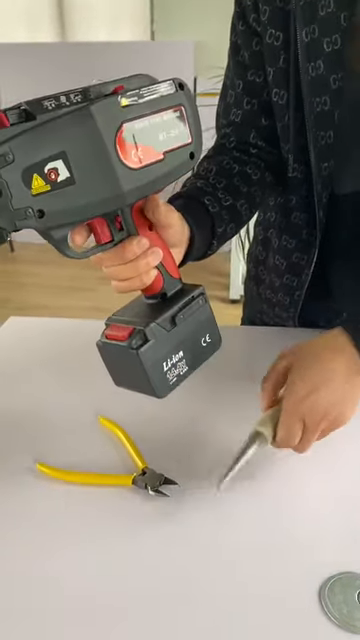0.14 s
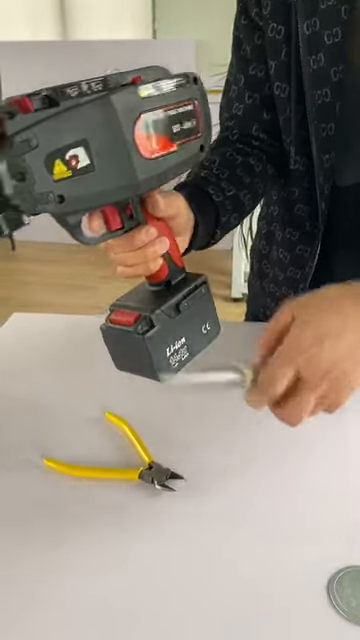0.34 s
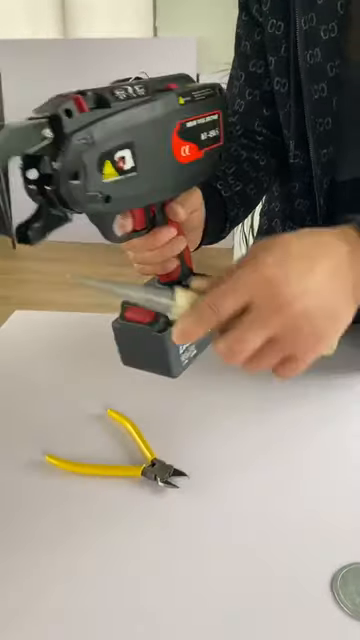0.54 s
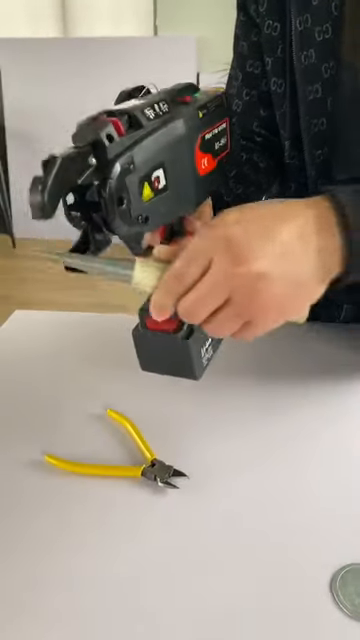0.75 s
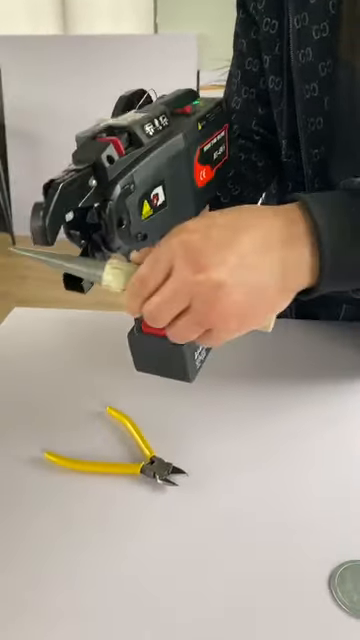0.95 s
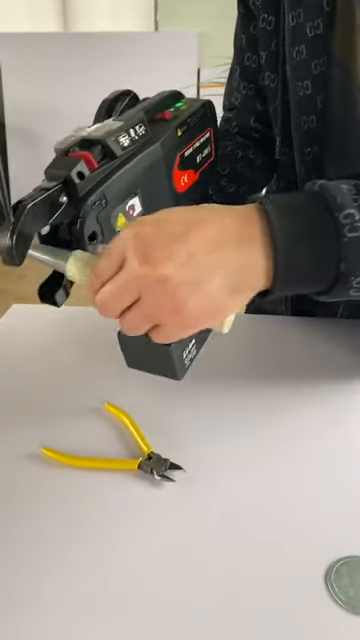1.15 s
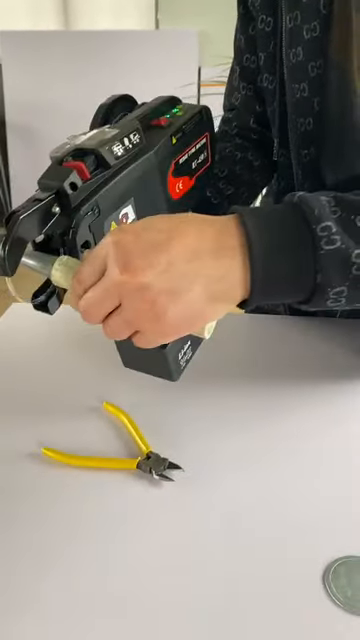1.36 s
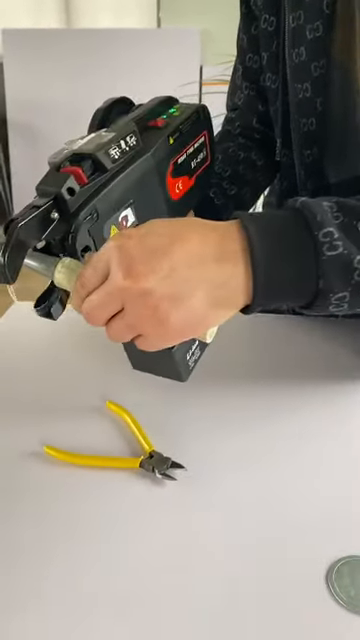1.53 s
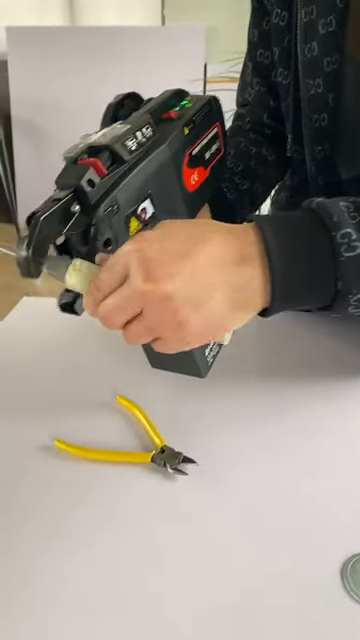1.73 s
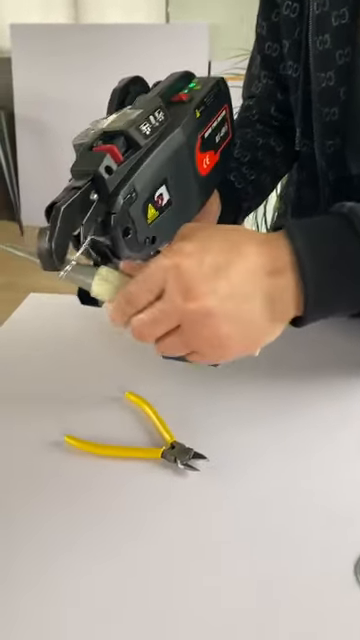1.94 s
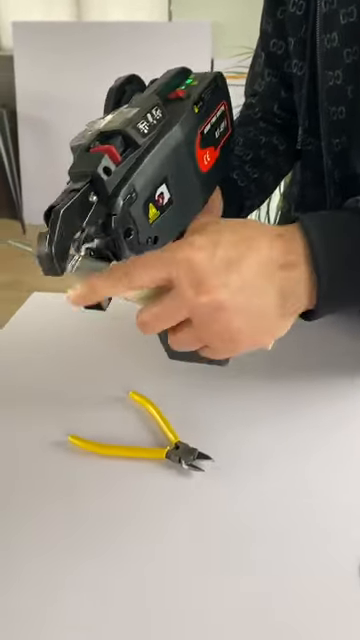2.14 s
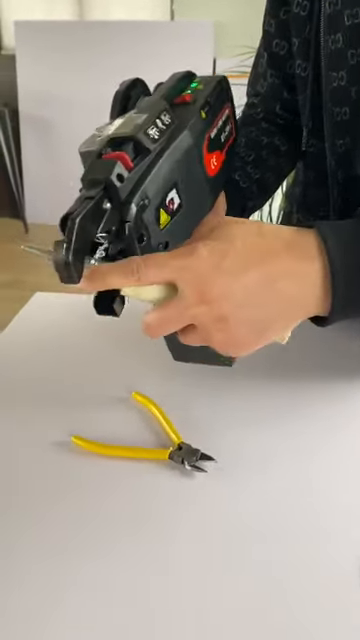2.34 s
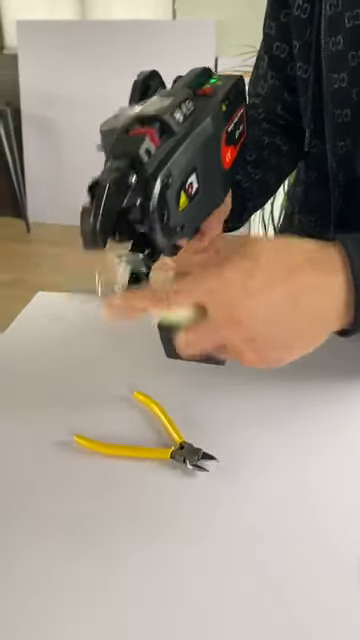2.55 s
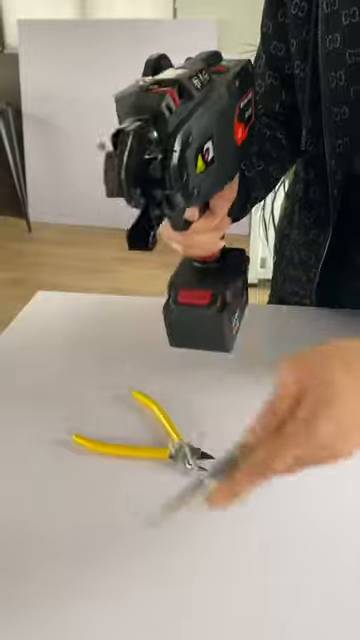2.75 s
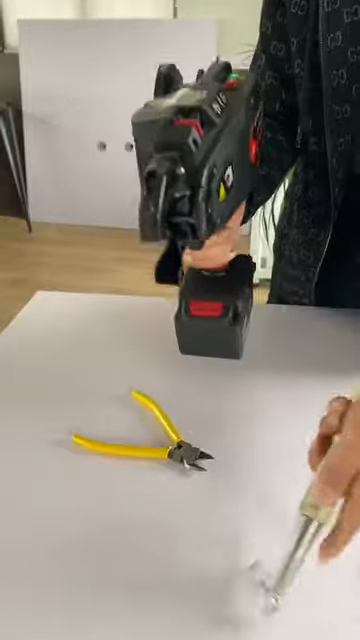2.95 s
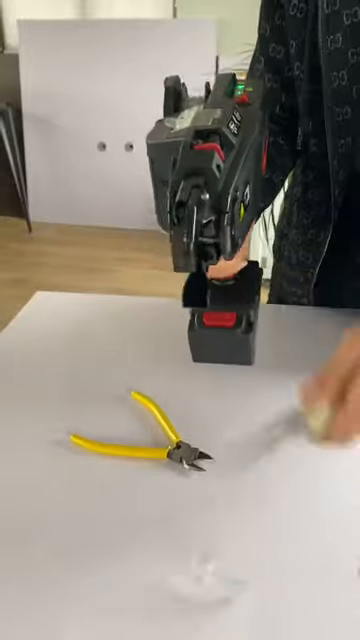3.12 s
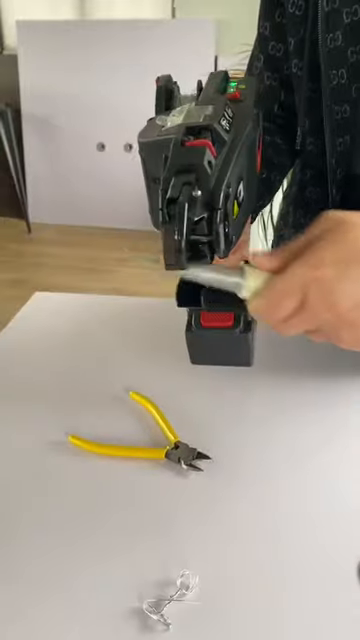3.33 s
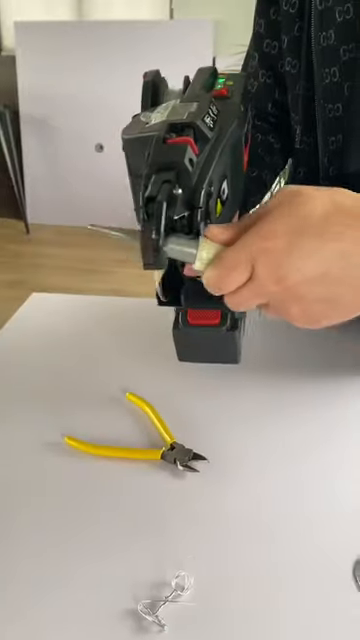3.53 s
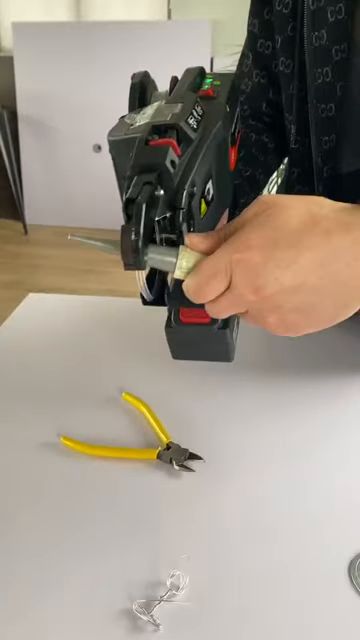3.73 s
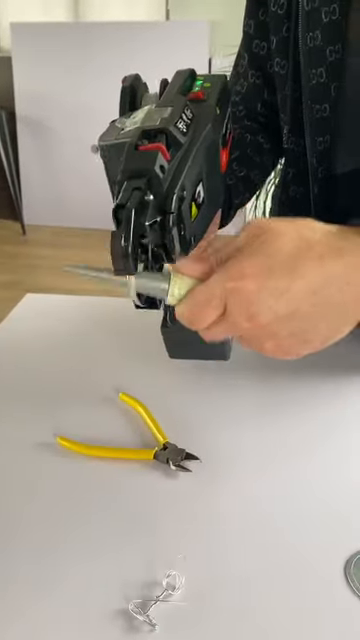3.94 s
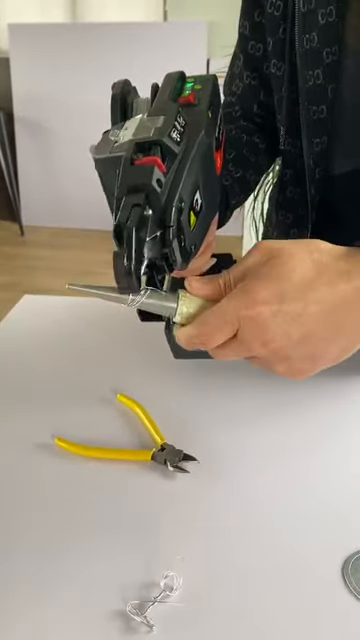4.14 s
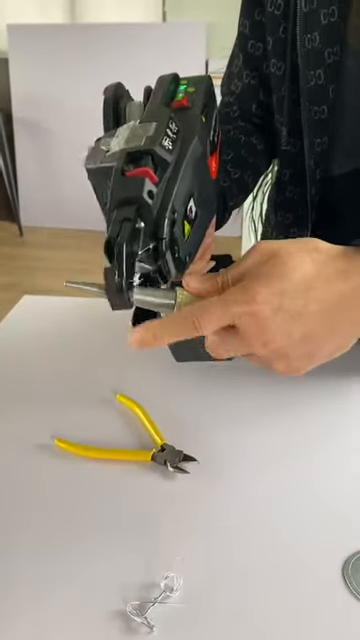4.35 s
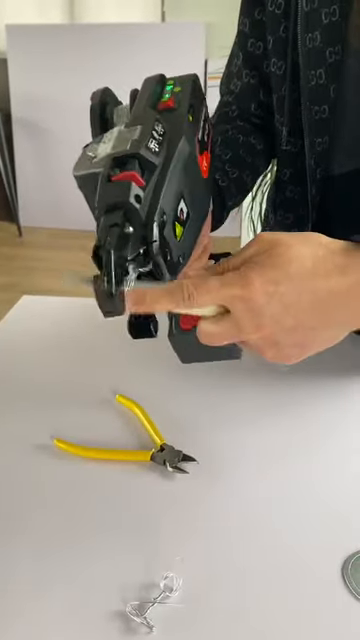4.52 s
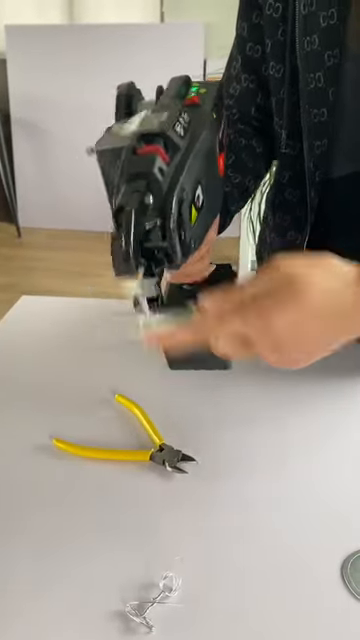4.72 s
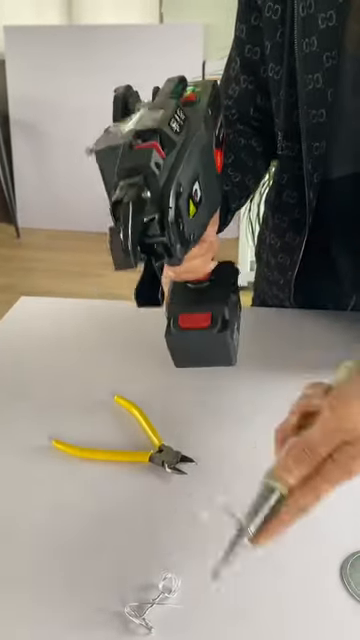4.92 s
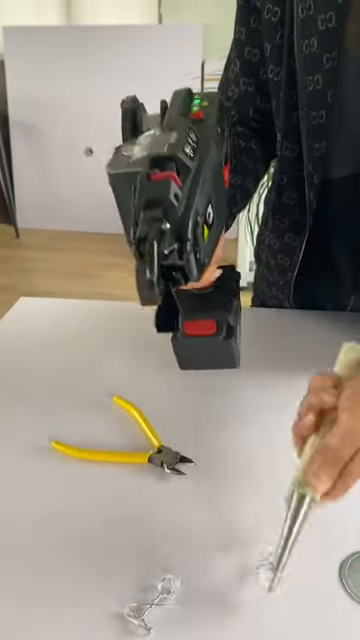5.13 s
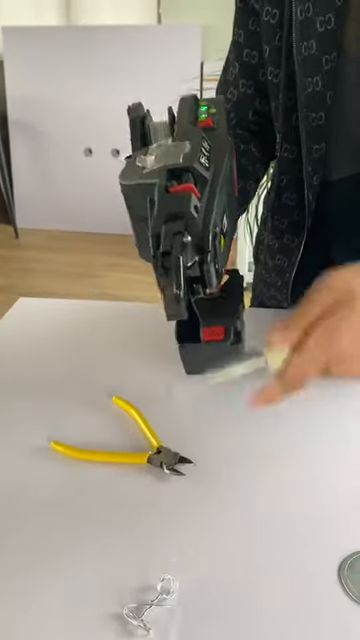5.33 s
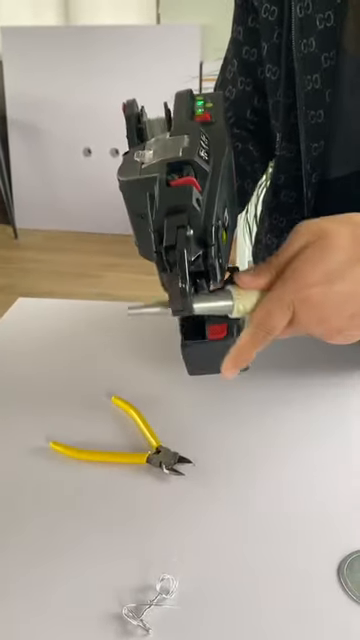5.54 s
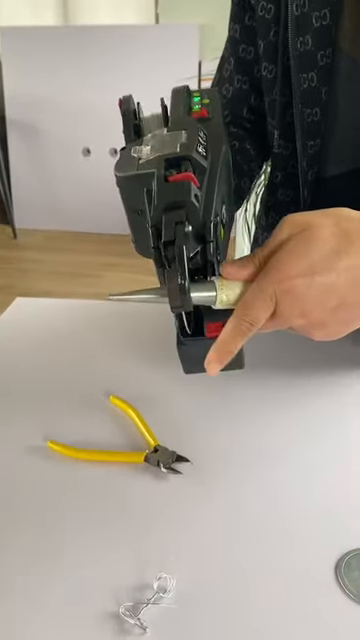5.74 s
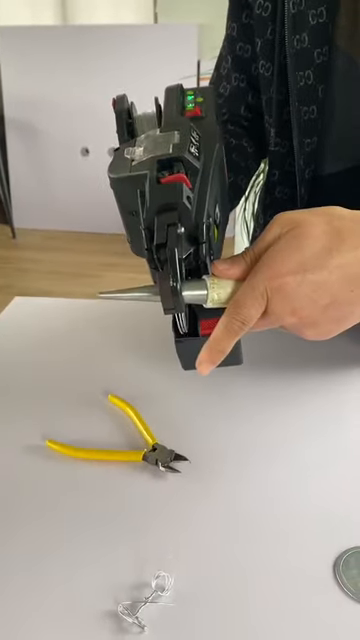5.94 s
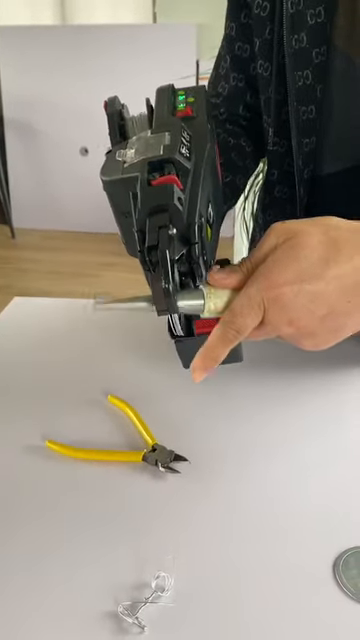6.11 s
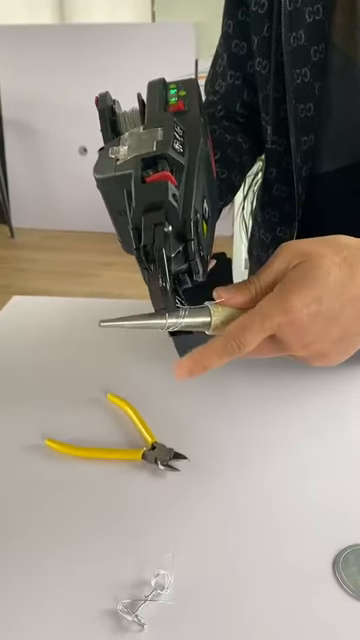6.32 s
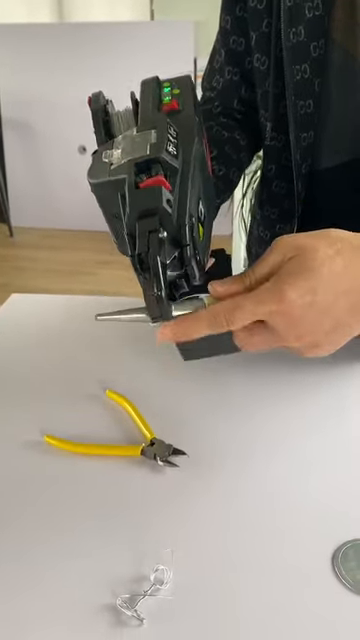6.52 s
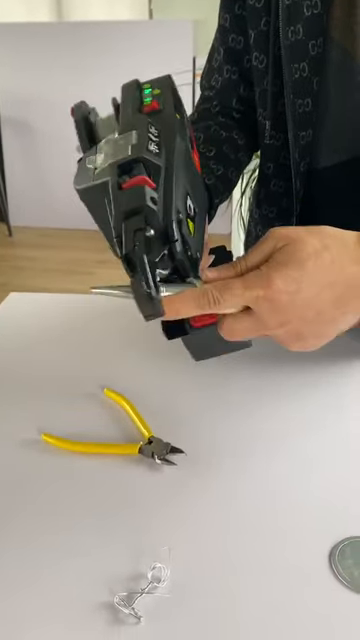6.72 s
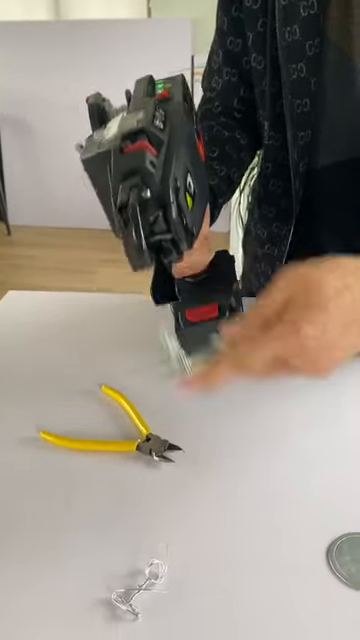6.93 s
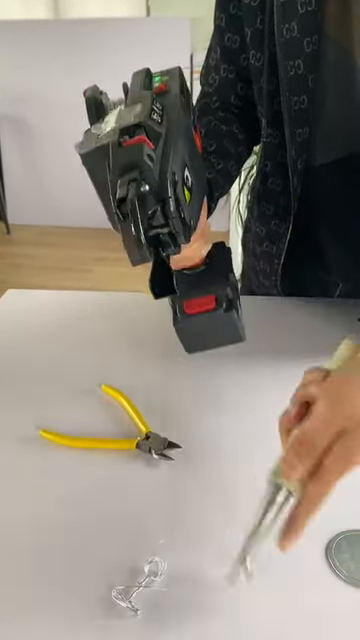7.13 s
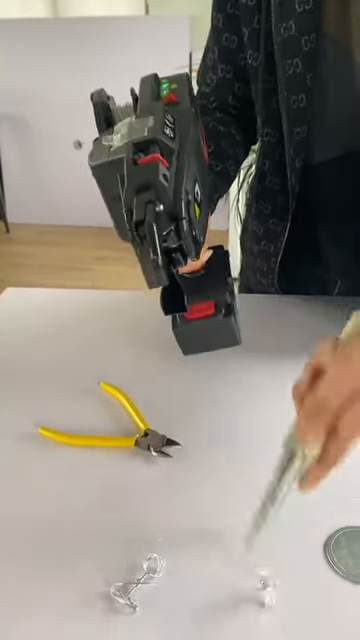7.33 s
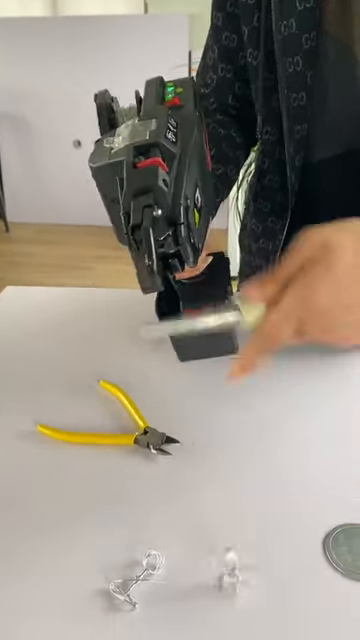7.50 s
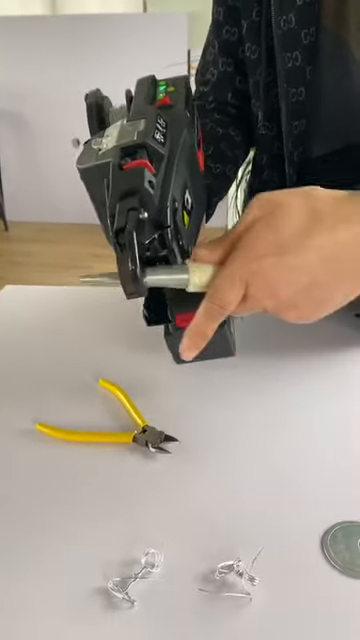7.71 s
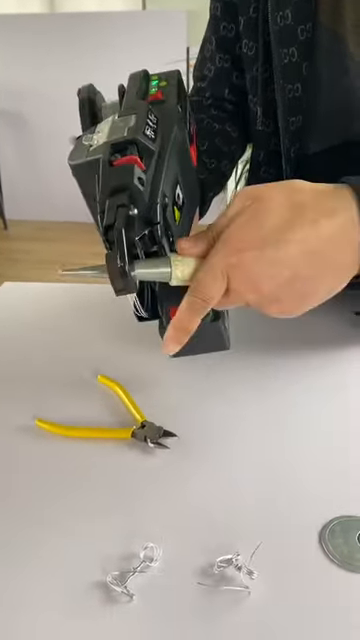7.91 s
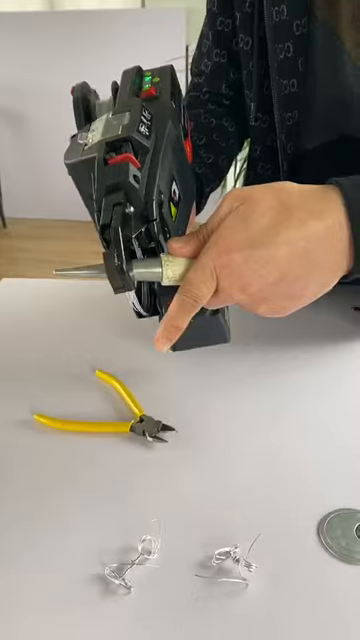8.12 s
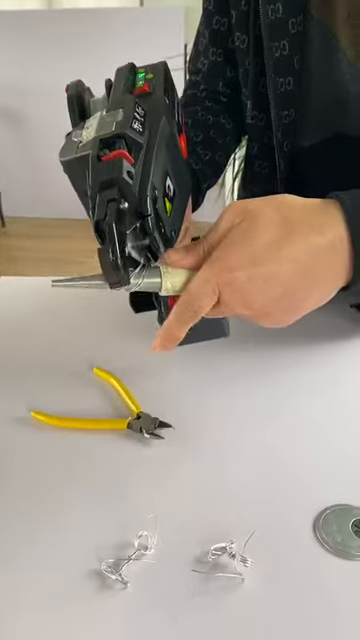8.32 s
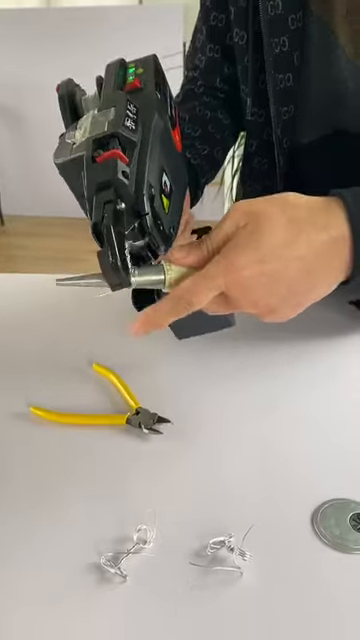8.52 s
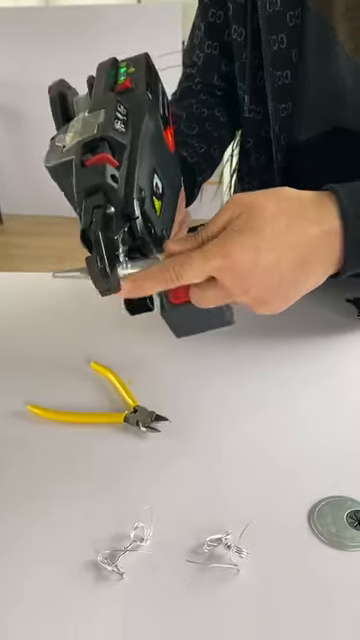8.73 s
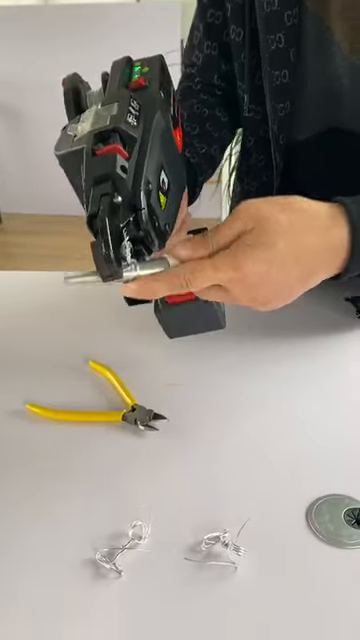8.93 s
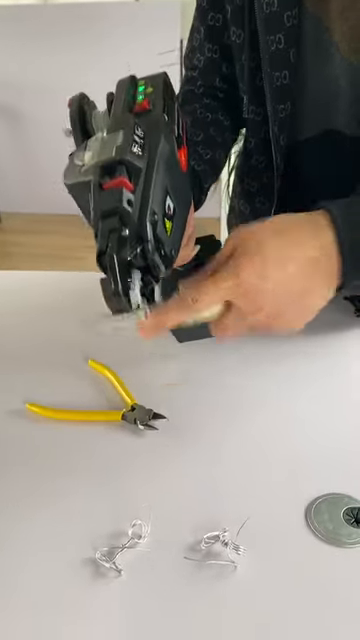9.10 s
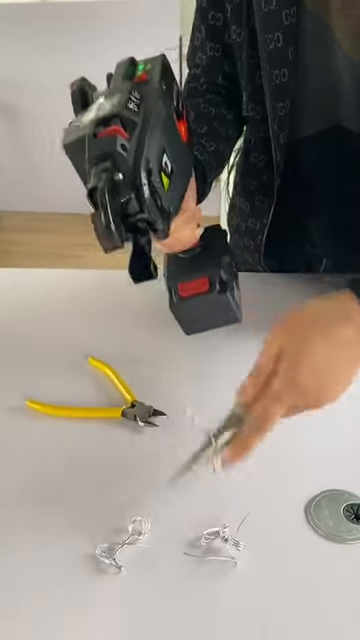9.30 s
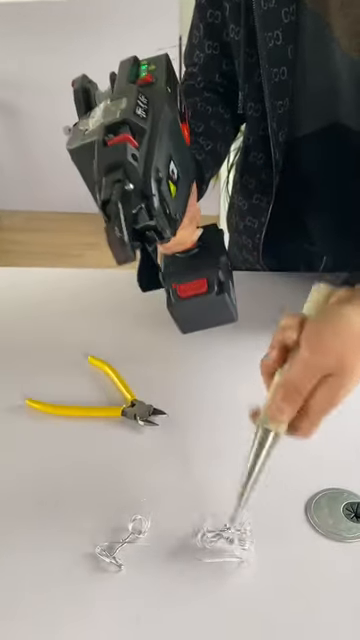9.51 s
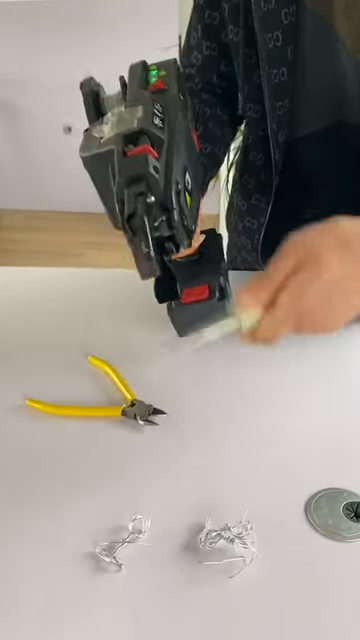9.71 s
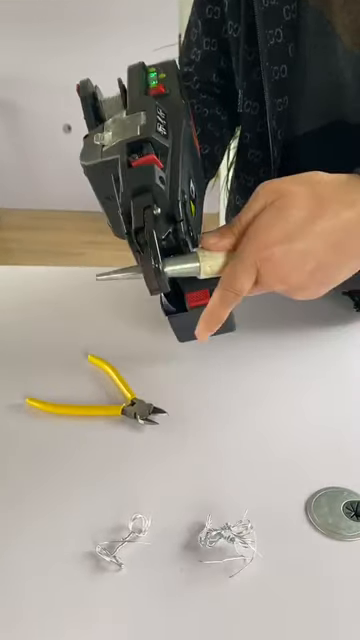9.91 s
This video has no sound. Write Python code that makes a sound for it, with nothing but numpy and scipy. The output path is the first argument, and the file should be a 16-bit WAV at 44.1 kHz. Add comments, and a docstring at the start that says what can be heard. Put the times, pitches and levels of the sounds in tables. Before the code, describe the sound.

A handheld wire tying tool makes four ties close by in a small, slightly echoing room. Every tie is a rasping wire feed, a sharp cutting clack, a grinding, ratcheting motor whine that drops under load, and a short gear rattle. A low rumble, a rustle and the ringing knock of a steel spike come first, small metal clinks and knocks fill the pauses, and another feed starts at the very end over a faint electrical hum.

```python
"""A low rumble, a soft rustle and a faint clink, then a steel spike knocks and rings in a rebar tier's jaw.
The cordless tool makes four ties around the spike, over a table in a small hard room, and starts a fifth.
In each, rollers feed scraping wire, the cutter clacks, and rattling gears close the hook. The hook twists
with a gear whine that sags under load while the clutch ratchets, and then runs back.
Wire and spike clink between the ties, over a faint mains hum."""
import sys
import numpy as np
from scipy import signal
from scipy.fft import rfft, irfft
from scipy.io import wavfile

SR = 44100
rng = np.random.default_rng(int(sys.argv[2]) if len(sys.argv) > 2 else 0)


def to_wav(s):
    """Save 16-bit WAV."""
    ch = np.atleast_2d(s).T  # columns
    pcm = np.round(np.clip(ch, -1, 1) * 32767)  # PCM
    wavfile.write(sys.argv[1], SR, pcm.astype(np.int16))


N = 439236
BRAKE_S = 0.015  # the motor is braked at the end of a twist


def amp(db):
    """Amplitude ratio: tenfold for every 20 dB."""
    return 10 ** (np.asarray(db) / 20)


def unit(x):
    """Normalisation to rms 1."""
    return x / np.sqrt(np.mean(x ** 2) + 1e-20)


def read(points, hz):
    """Interpolation of a table on a log-frequency axis."""
    table_hz, values = np.transpose(points)
    return np.interp(np.log(hz + 1), np.log(table_hz + 1), values)


def add(mix, start, sound):
    """Superposition: a sound joins the mix at its start time."""
    part = mix[max(round(start * SR), 0):][:len(sound)]
    part += sound[:len(part)]


def gate(t, rise_s=0.0068, fall_s=0.0034):
    """Trapezoidal envelope: attack, hold and release."""
    return np.clip(np.minimum(t / rise_s, (t[-1] - t) / fall_s), 0, 1)


def bump(t, half_length):
    """Gaussian pulse of height 1 around t = 0."""
    return np.exp(-(t / half_length) ** 2)


def wander(size, cutoff_hz):
    """Random modulation: low-passed noise of rms near 1."""
    hz = np.fft.rfftfreq(2 ** 16, 1 / SR)
    spectrum = rfft(rng.standard_normal(2 ** 16)) / (1 + (hz / cutoff_hz) ** 4)
    return np.resize(unit(irfft(spectrum)), size)


def chatter(size, per_s, spread_db):
    """Shot noise: dense tiny impacts of uneven strength."""
    strength = amp(spread_db * np.minimum(rng.exponential(1, size), 4))
    return unit(strength * rng.choice([-1, 1], size) * (rng.random(size) < per_s / SR))


def colour(x, spectrum):
    """Minimum-phase filtering: a causal response with the given spectrum."""
    log_gain = np.log(amp(read(spectrum, abs(np.fft.fftfreq(2048, 1 / SR)))))
    taps = np.fft.ifft(np.exp(np.conj(signal.hilbert(log_gain)))).real[:1024]
    return signal.oaconvolve(x, taps)[:len(x)]


def brighten(spectrum, treble_db):
    """Treble shelf, sloping over the octave above 4500 Hz."""
    return [(hz, db + treble_db * np.clip(np.log2(hz / 4500), 0, 1)) for hz, db in spectrum]


def resonate(x, hz, width_hz):
    """Second-order resonance of peak gain 1."""
    return signal.lfilter(*signal.iirpeak(hz, hz / width_hz, SR), x)


def ring(modes, t):
    """Free vibration: a sum of exponentially damped modes."""
    return sum(amp(db - 60 * t / t60) * np.sin(2 * np.pi * (hz * t + rng.random()))
               for hz, db, t60 in modes)


def background(rumble_db=-54, rustle_db=-56, edge_s=0.029):
    """Incoherent noises add in power: rumble and rustle swell as the tool is handled, over mains hum."""
    # movements of the tool: (start [s], length [s], rumble [dB], rustle [dB])
    swells = [(0, 0.36, -42, -47.5), (0.352, 1.34, -42, -51.5), (2.95, 1.08, -49, -56.5),
              (5.309, 1.2, -51.5, -56), (8.102, .35, -54.5, -55), (9.44, 0.15, -48.5, -52)]
    # spectra of the low rumble and the soft rustle: (frequency [Hz], density [dB])
    rumble_spectrum = [(18, -8.5), (32, -4.5), (48, 7.5), (80, 9.5), (140, 5.5), (200, -0.5), (400, -48)]
    rustle_spectrum = [(100, -2), (250, 1.5), (550, -4), (1000, -7), (2000, -18), (5000, -29),
                       (9000, -46.5), (14000, -47)]
    # mains harmonics: (frequency [Hz], rms level [dB])
    harmonics = [(49.5, -55), (99, -61.5), (149, -59.5)]
    t = np.arange(N) / SR
    rumble_rms, rustle_rms = amp(rumble_db), amp(rustle_db)
    for start, length, low_db, high_db in swells:
        swell = (np.tanh((t - start) / edge_s) - np.tanh((t - start - length) / edge_s)) / 2
        rumble_rms = np.hypot(rumble_rms, amp(low_db) * swell)
        rustle_rms = np.hypot(rustle_rms, amp(high_db) * swell)
    rumble = rumble_rms * unit(colour(rng.standard_normal(N), rumble_spectrum))
    rustle = rustle_rms * unit(colour(rng.standard_normal(N), rustle_spectrum))
    hum = sum(amp(db) * np.sin(2 * np.pi * hz * t + 0.76 * wander(N, 3.8)) for hz, db in harmonics)
    return rumble + rustle + np.sqrt(2) * hum


def strike(spectrum, contact_s, buzz_db, buzz_s, rise_s=0.00088):
    """Impact noise of metal on metal: a short scraping contact, then loose parts buzz; peak near 1."""
    t = np.arange(SR // 8) / SR
    decay = np.exp(-t / contact_s) + amp(buzz_db) * np.exp(-t / buzz_s)
    attack = 1 - np.exp(-t / rise_s)
    tick = colour(attack * decay * rng.standard_normal(len(t)), spectrum)
    return tick / (3 * np.std(tick[:SR // 250]))


def clink(start, peak_db, bright_db, neutral_db=-7):
    """Impact noise: a light clink of wire and spike, each with its own level and brightness."""
    # spectrum of a light contact: (frequency [Hz], density [dB])
    contact_spectrum = [(120, -30), (240, -2.5), (420, -5), (700, -6.5), (2740, -8), (3440, -1), (4150, -8),
                        (5330, -0.5), (6520, -7), (7390, -15), (11000, -2), (14000, -7)]
    spectrum = brighten(contact_spectrum, bright_db - neutral_db)
    tick = strike(spectrum, contact_s=0.0013, buzz_db=-18, buzz_s=0.017, rise_s=0.001)
    return start, amp(peak_db) * tick


def knock(start, peak_db, treble_db):
    """Impact excitation: a heavy part hits its stop."""
    # spectrum of a heavy contact: (frequency [Hz], density [dB])
    contact_spectrum = [(180, -53), (300, -15), (2000, 1.5), (3090, -6.5), (5330, -10), (6580, -24.5),
                        (7240, -40), (7970, -17.5), (10100, -8), (14000, -29.5)]
    spectrum = brighten(contact_spectrum, treble_db)
    return start, amp(peak_db) * strike(spectrum, contact_s=0.0017, buzz_db=-8.5, buzz_s=0.009)


def spike(start, level_db):
    """Amplitude modulation: the hand-held spike rattles, so each mode rings roughly."""
    # modes of the steel spike: (frequency [Hz], level [dB], T60 [s])
    modes = [(1300, -6, .2), (2166, -8, 0.25), (3550, -0.5, 0.38), (3670, -2.5, 0.4), (3840, -12, .45),
             (4000, -6.5, .35), (4250, -0.5, 0.11), (6000, -18, .28), (9600, -19, 0.32)]
    t = np.arange(SR // 2) / SR
    return start, amp(level_db) * sum(ring([mode], t) * wander(len(t), 57) for mode in modes)


def feed(start, level_db, gears_db, length=0.419, roller_hz=46.2, scrape_db=-2, fade_db_per_s=4):
    """Friction excites resonances: a geared roller drives the scraping wire through its guide."""
    # spectrum of the scraping wire: (frequency [Hz], density [dB])
    scrape_spectrum = [(150, -54), (250, -26), (571, -22), (914, -9), (1140, -10), (1320, -2.5),
                       (1520, -9.5), (1820, -4), (3230, -14.5), (5180, -16), (6670, -21), (7260, -45),
                       (7760, -27), (9500, -16.5), (14000, -25)]
    # resonances of the wire guide: (frequency [Hz], bandwidth [Hz], gain [dB])
    guide_modes = [(417, 33, 7), (710, 140, 1), (1230, 320, -5), (2710, 430, -3.5), (3870, 320, 1.5),
                   (5144, 380, 4)]
    # gear tones: (multiple of the roller's rate [1], level [dB])
    orders = [(14.1, -14.5), (20, -7), (28.1, -1.5), (29, -7.5), (40, -7.5), (43, -8.5), (60.5, -11.5)]
    spin_up_s, overshoot, settle_s, sag_per_s = 0.014, 0.085, 0.075, 0.022
    t = np.arange(0, length, 1 / SR)
    size, from_middle = len(t), t - t[-1] / 2
    spin_up = 1 - np.exp(-t / spin_up_s)
    speed = spin_up * (1 + overshoot * np.exp(-t / settle_s) - sag_per_s * from_middle)
    turns = np.cumsum(roller_hz * speed * (1 + 0.0036 * wander(size, 40))) / SR
    throb = 1 + 0.22 * np.cos(2 * np.pi * turns)  # the roller grips harder on one side
    scrape = colour(chatter(size, per_s=6000, spread_db=0.92) * throb, scrape_spectrum)
    scrape = unit(scrape + sum(amp(db) * resonate(scrape, hz, width) for hz, width, db in guide_modes))
    tones = sum(amp(db) * np.sin(2 * np.pi * order * turns) * (1 + 0.33 * wander(size, 50))
                for order, db in orders)
    pinch_db = 8 * bump(t - t[-1], 0.027)  # the closing blade pinches the wire
    envelope = np.sqrt(gate(t, rise_s=0.022)) * amp(level_db - fade_db_per_s * from_middle + pinch_db)
    return start, envelope * (amp(scrape_db) * scrape + amp(gears_db) * tones * throb)


def cut(time, level_db, thump_db, crack_db, housing_db=-6, shear_s=0.004, lead_s=0.0005):
    """Transient excitation: the blade shears the wire with a crack and slams the housing into ringing."""
    # spectrum of the shearing wire: (frequency [Hz], density [dB])
    crack_spectrum = [(88, -52.5), (150, -10.5), (380, -14), (659, -6.5), (945, -2), (2060, 0.5),
                      (3190, -10), (5420, -8.5), (7340, -28), (8230, -18.5), (9760, -15.5), (11800, -16),
                      (14000, -42.5)]
    # modes of the housing: (frequency [Hz], level [dB], T60 [s])
    housing_modes = [(243, -17, 0.12), (354, -8.5, .04), (390, -6.5, 0.051), (448, -4.5, .07),
                     (972, -2, 0.041), (1220, -2.5, .036)]
    t = np.arange(SR // 4) / SR
    shear = (t / shear_s) ** 2 * np.exp(2 - 2 * t / shear_s)
    crack = colour(shear * rng.standard_normal(len(t)), crack_spectrum)
    crack /= 2.66 * np.std(crack[:SR // 100])  # peak near 1
    thump = ring(housing_modes, t) * (1 - bump(t, 0.006))
    return time - lead_s, amp(level_db) * (amp(crack_db) * crack + amp(housing_db + thump_db) * thump)


def gear_case(x):
    """Gear-case resonances colour the gear noise; a notch thins it near 3350 Hz."""
    # resonances of the case: (frequency [Hz], bandwidth [Hz], gain [dB])
    case_modes = [(422, 44, -4.5), (696, 90, -2.5), (1400, 84, -11), (3040, 160, -11.5), (4890, 300, -7.5)]
    lifted = x + sum(amp(db) * resonate(x, hz, width) for hz, width, db in case_modes)
    return unit(lifted - resonate(lifted, hz=3350, width_hz=150))


def free_run(size, shake_db=1, lurch_db=1.6, case_share=0.28):
    """Backlash: unloaded teeth rattle in their play, heard partly through the gear case."""
    # spectrum of the unloaded gears: (frequency [Hz], density [dB])
    rattle_spectrum = [(150, -54.5), (250, -27.5), (451, -18), (631, -13), (773, -1.5), (1200, -5),
                       (2510, 2.5), (3400, -10.5), (5270, -3.5), (6560, -14.5), (7260, -35.5),
                       (8030, -18.5), (10200, -11.5), (12200, -18.5), (14000, -49)]
    impacts = chatter(size, per_s=3000, spread_db=2.7)
    flicker = amp(shake_db * wander(size, 130) + lurch_db * wander(size, 35.3))
    rattle = unit(colour(impacts * flicker, rattle_spectrum))
    return unit((1 - case_share) * rattle + case_share * gear_case(rattle))


def close_hook(cut_s, gain_db=-1):
    """Backlash rattle: after the cut, the gears run free and drive the hook shut."""
    # contour of the closing: (time after the cut [s], relative level [dB])
    contour = [(.022, -24), (.045, -28.5), (.09, -25), (.122, -20.5), (.146, -28), (.175, -25)]
    times, levels_db = np.transpose(contour)
    t = np.arange(0, times[-1] - times[0], 1 / SR)
    envelope = gate(t) * amp(np.interp(t + times[0], times, levels_db) + gain_db)
    return cut_s + times[0], envelope * free_run(len(t))


def whine(mesh_hz, teeth, tone_db, octave_db, case_hz=4800, case_half_width_hz=750):
    """Gear-mesh tone: it roughens as load slows it, and its octave swells near a case resonance."""
    # faint tones of the other gear stages: (multiple of the mesh rate [1], level re the whine [dB])
    side_orders = [(.59, -21.5), (.87, -16.5), (1.45, -20.5), (2.28, -19)]
    stage_ratio, stage_db = 0.297, -31.5  # a slower stage, heard mostly near top speed
    size = len(teeth)
    speed = mesh_hz / mesh_hz.max()
    flutter = 0.18 + 0.55 * (1 - speed)
    fundamental = np.sin(2 * np.pi * teeth + flutter * wander(size, 140))
    fundamental *= 1 + flutter * wander(size, 140)
    near_case = 1 / (1 + ((2 * mesh_hz - case_hz) / case_half_width_hz) ** 2)
    octave = np.sin(4 * np.pi * teeth) * near_case * (1 + flutter * wander(size, 140))
    stage = np.sin(2 * np.pi * stage_ratio * teeth + 0.9 * wander(size, 60))
    stage *= 1 + 0.4 * wander(size, 70)
    sides = sum(amp(db) * np.sin(2 * np.pi * order * teeth) * wander(size, 40)
                for order, db in side_orders)
    tones = fundamental + amp(octave_db) * octave + sides
    return amp(tone_db) * tones + amp(stage_db) * speed ** 8 * stage


def gear_train(mesh_hz, tone_db, octave_db, grind_db, teeth_per_click=16.3, clutch_db=-32, rub_db=-5):
    """Mechanical coupling: whine and clutch clicks follow the motor; each click jolts the grinding."""
    # spectra of the ratcheting clutch and the grinding gears: (frequency [Hz], density [dB])
    clutch_spectrum = [(1000, -21.5), (3000, -6.5), (5500, -8), (8200, -11), (9400, 4), (10700, 7),
                       (11600, -2.5), (12500, -11), (14000, -11)]
    grind_spectrum = [(150, -31), (300, -31.5), (430, -18.5), (570, -17.5), (700, -5.5), (880, -6),
                      (1450, -0.5), (2200, 4.5), (2900, 0.5), (4300, -4.5), (5400, 0), (6700, -15),
                      (14000, -20)]
    uneven_db, lurch_db, jolt_s = 2, 0.6, 0.0014
    size = len(mesh_hz)
    teeth = np.cumsum(mesh_hz * (1 + 0.00202 * wander(size, 90))) / SR
    click_count = np.floor(np.maximum.accumulate(teeth / teeth_per_click + 0.1 * wander(size, 70)))
    clicks = np.diff(click_count, prepend=click_count[0]) * amp(uneven_db * wander(size, 150))
    rub = amp(rub_db) * chatter(size, per_s=3000, spread_db=5.9)
    clutch = unit(colour(unit(clicks) + rub, clutch_spectrum))
    jolts = 1 + 0.41 * signal.lfilter([1], [1, -np.exp(-1 / (jolt_s * SR))], clicks)
    impacts = chatter(size, per_s=3500, spread_db=1.9) * jolts * amp(lurch_db * wander(size, 47))
    grinding = gear_case(colour(impacts, grind_spectrum))
    return whine(mesh_hz, teeth, tone_db, octave_db) + amp(grind_db) * grinding + amp(clutch_db) * clutch


def twist(start, length, bite_after, bite_s, drop_hz, whine_db, octave_db, strain_db, grind_db):
    """A motor slows as torque rises: the pitch sags once the wire bites and picks up at each slip."""
    # the wire slips or gives way: (time [s], half length [s], mesh rise [Hz], whine change [dB])
    slips = [(2.186, .014, 101, -13), (2.313, .054, 770, 9.5), (4.409, .017, 176, -9.5),
             (6.635, .016, 80, 1), (6.709, 0.013, 135, -6), (8.649, 0.02, 191, -8.5)]
    unloaded_hz, sag_hz_per_s = 2364, 450  # gear mesh rate as the wire winds up
    strain_hz, strain_half_width_hz = 1789, 59  # the housing sings when the gears slow to this pitch
    slip_lead_s = 0.0051  # the teeth lose their load just before the speed peaks
    t = np.arange(0, length, 1 / SR)
    load = 1 / (1 + np.exp((bite_after - t) / bite_s))
    mesh_hz = unloaded_hz - sag_hz_per_s * (t - bite_after) - drop_hz * load
    mesh_hz -= 130.8 * np.exp(-t / 0.03)  # spin-up
    mesh_hz -= 90 * np.exp((t - length) / 0.025)  # a last sag before the stop
    seating_db = -8 * np.exp(-t / 0.06)  # the whine is weak until the teeth seat
    tone_db = whine_db + 2 + seating_db - 3 * load + 1.56 * wander(len(t), 30)
    for time, half_length, rise_hz, change_db in slips:
        from_slip = start + t - time
        mesh_hz += rise_hz * bump(from_slip, half_length)
        tone_db += change_db * bump(from_slip + slip_lead_s, half_length)
    tone_db += strain_db / (1 + ((mesh_hz - strain_hz) / strain_half_width_hz) ** 2)
    snatch_db = 4 * np.exp(-t / 0.044)  # grinding is harder as the hook snatches the wire
    loaded_grind_db = grind_db + 1.28 + snatch_db + load  # and 1 dB harder under full load
    gears = gear_train(mesh_hz, tone_db, octave_db - 4.5 * load, loaded_grind_db)
    return start, gate(t, rise_s=0.015, fall_s=BRAKE_S) * gears


def run_back(start, length, level_db, gain_db=-1, coast_s=0.036, coast_db=-13.5):
    """Backlash rattle as the empty hook turns back, decaying exponentially as the gears coast to rest."""
    t = np.arange(0, length + coast_s, 1 / SR)
    fade_db = coast_db * np.maximum(t - length, 0) / coast_s
    return start, gate(t) * amp(level_db + gain_db + fade_db) * free_run(len(t))


def room(x, tail_db, table_db=-11, table_s=0.0021, build_s=0.00097):
    """Reverberation: an early reflection off the table and a diffuse tail, each band at its own decay."""
    # reverberation times: (frequency [Hz], T60 [s])
    decay_times = [(200, 0.96), (800, 0.56), (2500, 0.66), (5500, 0.72), (12000, 0.32)]
    hz, t, noise = signal.stft(rng.standard_normal(SR), SR, nperseg=256)
    envelope = amp(-60 * t / read(decay_times, hz)[:, None]) * (1 - np.exp(-t / build_s))
    tail = signal.istft(noise * envelope, SR, nperseg=256)[1]
    response = amp(tail_db) * tail / np.linalg.norm(tail)
    response[round(table_s * SR)] += amp(table_db)
    return x + signal.fftconvolve(x, response)[:N]


def scene():
    """Superposition of the tool's strokes, the slightly drier touches of metal, and the background."""
    # light touches of wire and spike: (time [s], nominal peak [dB], brightness [dB])
    clinks = [(0.2713, -46, -22), (1.138, -41.5, -14), (2.598, -29.5, -18), (2.6394, -39, -9),
              (2.9255, -26.5, -15.5), (2.9908, -36, -13), (3.028, -35.5, -12.5), (3.1772, -34.5, -13.5),
              (3.1898, -32, -9), (3.239, -31, -12.5), (4.739, -27.5, -14), (5.0469, -37, -7),
              (5.0636, -39, -13), (5.1497, -47, -18), (5.2254, -52, -2), (5.3832, -28.5, -7),
              (5.438, -27, -13.5), (5.46, -35, -16), (5.4969, -35, -10), (5.534, -35, -15),
              (5.5577, -35.5, -6.5), (5.5857, -35, -13), (5.6237, -39, -12.5), (7.1712, -26, -11),
              (7.2015, -28.5, -9), (7.3486, -38, -10), (7.6311, -34, -15), (9.1227, -35, -15),
              (9.1402, -26, -5), (9.1554, -31.5, -18), (9.4849, -31.5, -12), (9.9069, -21.5, -15)]
    # knocks of hook, jaw and spike: (time [s], nominal peak [dB], extra treble [dB])
    knocks = [(0.762, -16.5, 1), (0.772, -25, -2), (1.755, -7.5, -0.5), (2.463, -15, 7.5), (4.623, -11, 1),
              (6.228, -9, 0), (8.835, -11.5, 4.5), (9.166, -33, 0), (9.454, -28.5, 4)]
    # wire feeds: (start [s], level [dB], gear tones re that level [dB])
    feeds = [(1.186, -23, -7), (3.422, -27.5, -8.5), (5.657, -28, -7.5), (7.698, -28.5, -8.5),
             (9.891, -29, -13)]
    # cutter strokes: (time [s], level [dB], extra thump [dB], extra crack [dB])
    cuts = [(1.584, -3.5, -2, 0), (3.828, -5.5, 2.5, 0.5), (6.058, -7, 4, 0.5), (8.105, -4.5, -0.5, 0)]
    # twists, with relative levels: (start [s], length [s], bite delay [s], bite time constant [s],
    # mesh drop [Hz], whine [dB], octave [dB], strain [dB], grinding [dB], run-back [s], run-back [dB])
    twists = [(1.752, 0.54, 0.31, 0.026, 470.7, -22, -4, 1.5, -25.5, 0.25, -30.5),
              (3.985, .48, .305, .022, 519.3, -23.5, -5.5, 11, -24.5, 0.24, -32.5),
              (6.225, .523, .295, .031, 451, -24, -6.5, 10.5, -24.5, .22, -32.5),
              (8.25, 0.46, 0.29, 0.022, 531, -24.5, -9.5, 9.5, -24.5, 0.22, -31)]
    tool, touches = np.zeros((2, N))
    layers = (feed, feeds, tool), (cut, cuts, tool), (knock, knocks, touches), (clink, clinks, touches)
    for source, rows, mix in layers:
        for row in rows:
            add(mix, *source(*row))
    for cut_s, *_ in cuts:
        add(tool, *close_hook(cut_s))
    for start, length, *effort, back_s, back_db in twists:
        add(tool, *twist(start, length, *effort))
        add(tool, *run_back(start + length - BRAKE_S / 2, back_s, back_db))
    add(touches, *spike(start=0.762, level_db=-41))
    return (room(tool, tail_db=-9.5) + room(touches, tail_db=-10) + background())[None]


def record(dry, ceiling=0.68, cutoff_hz=14250):
    """Soft saturation rounds the highest peaks; two narrow notches and a low-pass trim the treble."""
    # stop bands: (centre [Hz], half width [Hz])
    notches = [(7300, 398), (13550, 330)]
    limited = dry / (1 + (dry / ceiling) ** 6) ** (1 / 6)
    hz = np.fft.rfftfreq(N, 1 / SR)
    gain = np.prod([1 - np.exp(-((hz - centre) / width) ** 6) for centre, width in notches], axis=0)
    notched = irfft(rfft(limited) * gain, N)
    low_pass = signal.firwin(511, cutoff_hz, window=("kaiser", 9), fs=SR)
    return signal.oaconvolve(notched, low_pass[None], "same")


dry = scene()
out = record(dry)
to_wav(out)
```